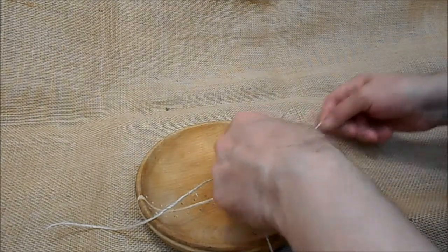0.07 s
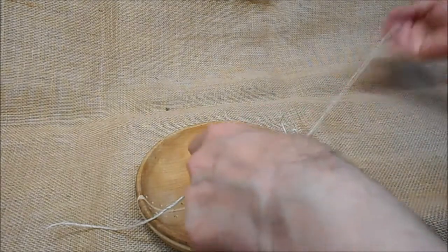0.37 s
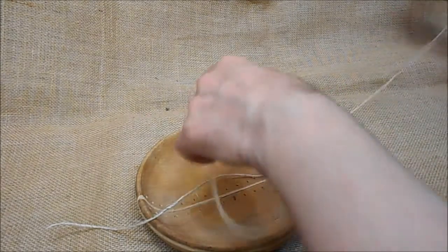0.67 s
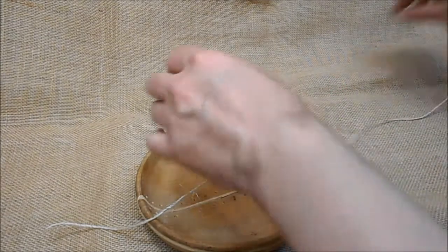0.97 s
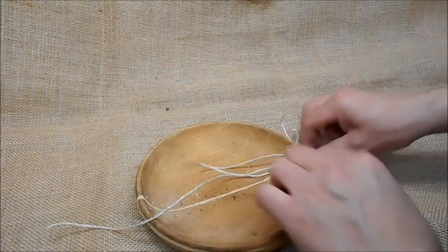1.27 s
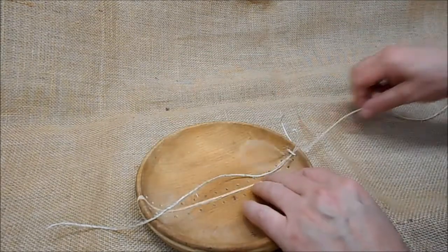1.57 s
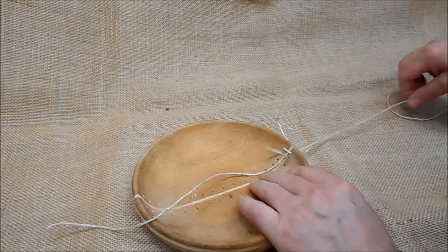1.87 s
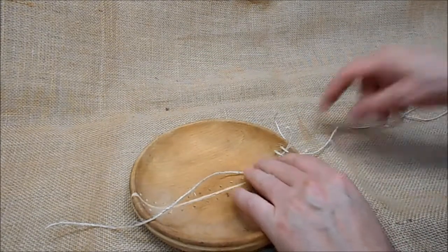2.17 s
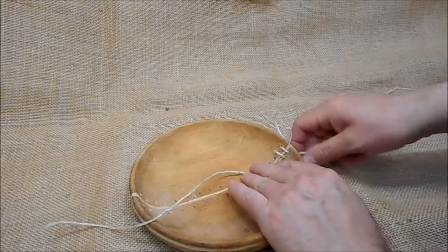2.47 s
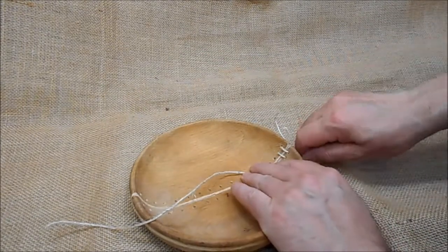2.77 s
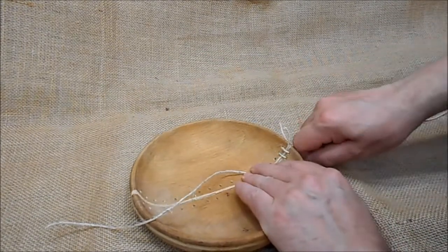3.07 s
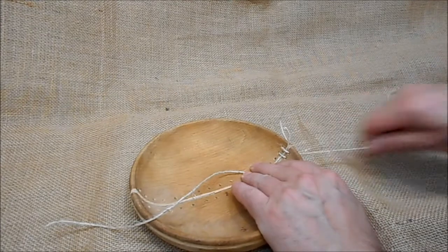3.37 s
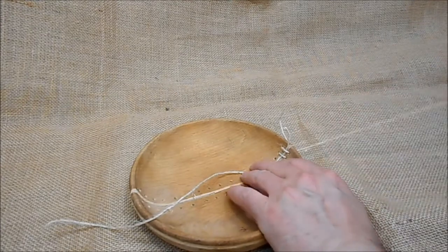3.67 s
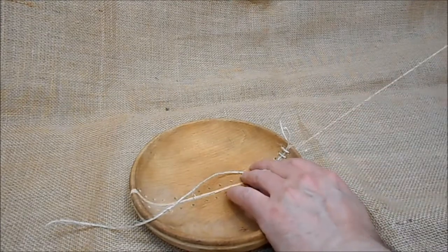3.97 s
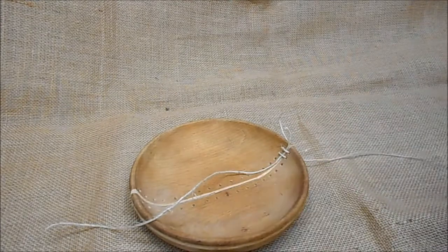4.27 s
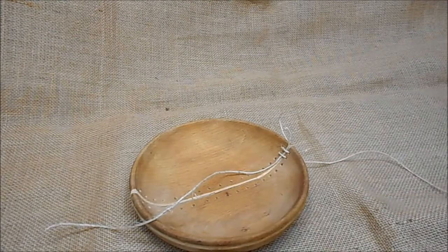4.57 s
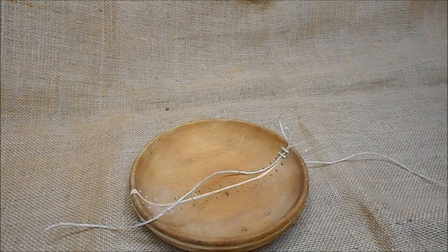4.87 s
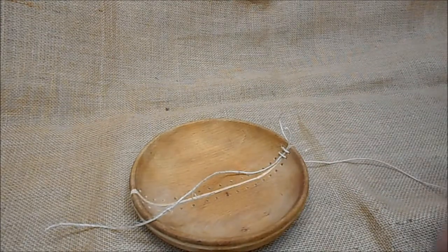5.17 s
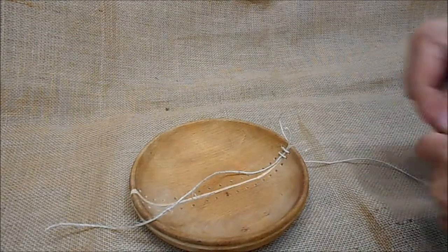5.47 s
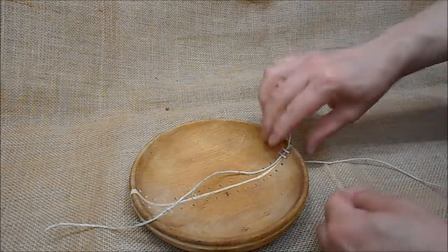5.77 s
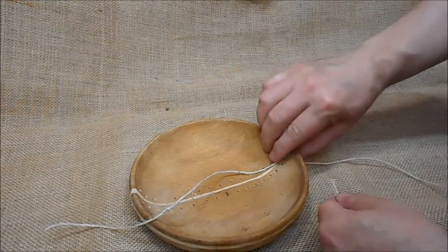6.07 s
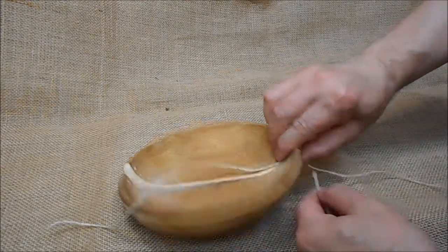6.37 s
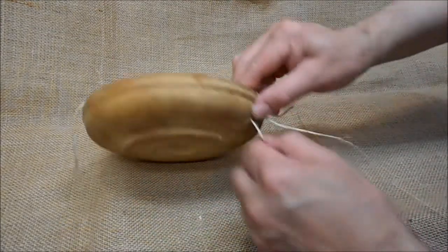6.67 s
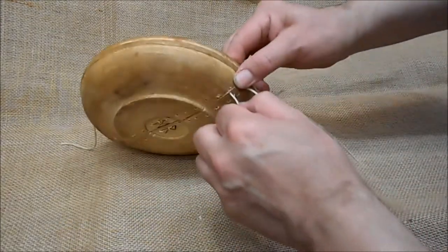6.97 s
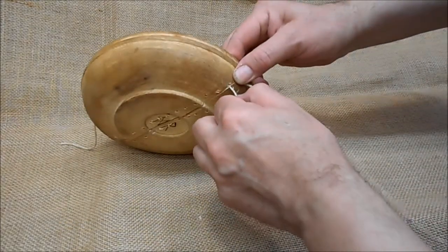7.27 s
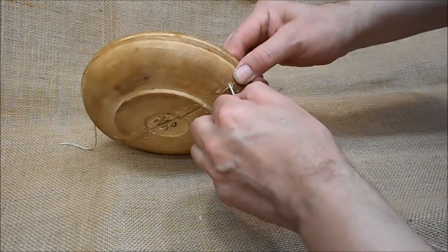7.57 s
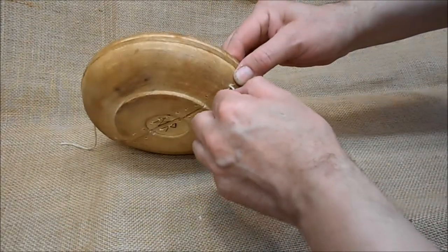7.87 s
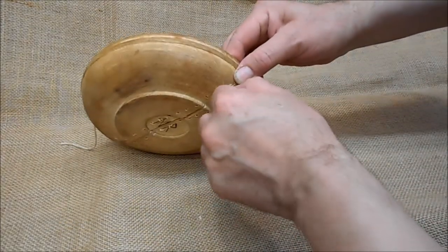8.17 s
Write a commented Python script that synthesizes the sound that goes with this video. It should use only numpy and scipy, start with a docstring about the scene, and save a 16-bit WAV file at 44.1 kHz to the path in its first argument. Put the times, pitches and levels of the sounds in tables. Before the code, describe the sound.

Cord is pulled through a wooden bowl's rim in scratchy, catching strokes, followed by quiet rubbing, fingernail ticks and two wooden thumps.

```python
"""A quiet room, where twine is laced through holes in the rim of a wooden bowl lying on burlap.
The cord rasps through the wood in tiny slips and catches that ring the bowl, hisses through the
fingers and over the cloth, and whistles faintly. Twice it jerks taut and thumps the bowl;
fingernails and cord tick on the rim. Dull table bumps, a faint drone and room tone sit underneath."""
import sys
import numpy as np
from scipy import signal
from scipy.fft import rfft, irfft
from scipy.io import wavfile

SR = 44100
rng = np.random.default_rng(int(sys.argv[2]) if len(sys.argv) > 2 else 0)


def pcm_store(signal):
    """Save signal as 16-bit PCM."""
    levels = np.round(np.clip(np.atleast_2d(signal), -1, 1) * 32767)
    wavfile.write(sys.argv[1], SR, levels.astype(np.int16).T)


N = 366471
TIME = np.arange(N) / SR
CUTOFF_HZ = 10250

# The hand draws cord through a hole: full_speed_s, rise_s, fall_s, level_db
HOLE_PULLS = [(.11, 0.13, 0.14, -34), (.25, 0.1, 0.082, -35), (.38, 0.16, 0.13, -34),
              (.51, 0.11, 0.081, -34.5), (.61, 0.044, 0.062, -39.5), (.72, 0.069, 0.053, -38.5),
              (.8, 0.055, 0.079, -51.5), (1.49, 0.09, .11, -41.5), (1.665, 0.11, 0.13, -44.5),
              (1.86, 0.12, 0.075, -44.5), (1.935, 0.063, 0.062, -44.5), (2.495, 0.044, 0.078, -45)]
# The twist of the cord catches in the hole and chatters: start_s, level_db, length_s
CORD_CATCHES = [(.001, -32.5, 0.013), (0.041, -30, 0.0061), (0.071, -28.5, 0.0074), (0.088, -31, 0.03),
                (0.14, -35, 0.0073), (0.175, -27.5, 0.0075), (0.195, -26, 0.024), (0.22, -29, 0.045),
                (0.259, -29.5, 0.03), (0.2936, -26, 0.022), (0.322, -28.5, 0.0071), (0.363, -29, 0.033),
                (0.407, -31.5, 0.0087), (0.469, -32.5, 0.0069), (.542, -30, 0.03), (0.693, -42, 0.024),
                (0.73, -35.5, 0.0072), (0.782, -32.5, 0.019), (.910, -47, 0.0056), (1.426, -46, .008),
                (1.482, -40.5, 0.0091), (1.628, -34.5, 0.0092), (1.654, -38.5, 0.016), (1.676, -37, 0.0044),
                (1.717, -37.5, 0.0052), (1.832, -37, 0.0078)]
# Ring of the bowl with the cord in the first hole: pitch_hz, width_hz, gain_db
FIRST_HOLE_MODES = [(534, 99, -26.5), (912, 76, -20), (1272, 37, -8), (1438, 72, -4), (1657, 33, -13),
                    (1770, 97, -15), (2220, 420, -18.5), (2414, 79, -8), (2604, 69, 0), (2750, 54, -5.5),
                    (2910, 70, -14.5), (3150, 72, -21), (3350, 90, -13), (3639, 98, 3), (3930, 71, -10),
                    (4110, 98, -8), (4730, 150, -15.5), (4870, 46, -2.5), (5090, 43, -10), (5560, 150, -17),
                    (6050, 165, -8.5), (7170, 140, -21), (7900, 140, -22.5), (8050, 110, -23),
                    (8880, 130, -19.5), (10070, 200, -39)]
# Its ring with the cord in the second hole: pitch_hz, width_hz, gain_db
SECOND_HOLE_MODES = [(630, 170, -18), (1437, 96, -2.5), (2607, 73, 2), (2955, 270, -7.5), (3620, 130, 1),
                     (4110, 150, -3), (4890, 94, -1.5), (5640, 160, -6.5), (6200, 150, -11),
                     (7050, 140, -17), (8780, 300, -15.5)]
# Direct sound of slipping fibres: frequency_hz, gain_db
FIBRE_EQ = [(100, -30.5), (300, -20.5), (600, -16), (1300, -1), (2800, 4.5), (4000, -1.5), (5400, -5),
            (6800, -6.5), (8500, -12), (10200, -19)]
# Loose cord runs through fingers and over cloth:
# full_speed_s, rise_s, fall_s, body_db, sheen_db, zip_centre_hz
CORD_SLIDES = [(1.34, 0.064, 0.12, -56, -66, 8000), (2.0, .1, 0.32, -62, -73, 8320),
               (2.519, 0.29, 0.44, -56, -55, 7700), (3.02, 0.22, 0.16, -59, -63, 7550),
               (3.32, 0.21, 0.18, -54.5, -54.5, 6300), (3.53, .17, 0.16, -53.5, -50.5, 7370),
               (3.87, 0.51, 0.32, -56, -61.5, 5500), (4.48, .11, .1, -62, -63, 7000),
               (4.6, 0.15, 0.093, -53, -50.5, 6530), (4.72, .2, .15, -57.5, -55, 6900),
               (4.93, 0.073, .1, -59, -57, 7000), (5.04, .2, .2, -66.5, -68, 7100),
               (5.421, 0.32, 0.35, -59, -60, 7070), (5.491, .08, 0.045, -59, -57.5, 6630),
               (5.9, .055, .035, -64, -65.5, 6320), (6.2, .2, 0.18, -58, -66, 6500),
               (6.415, 0.032, 0.05, -58.5, -65, 6470), (6.56, .13, 0.38, -64, -74, 6430)]
# Midrange body of the slide: frequency_hz, gain_db
SLIDE_BODY_EQ = [(80, -35), (300, -14), (900, -11), (1600, -8.5), (2600, -1.5), (3300, -4), (4200, 0),
                 (5300, -7), (6500, -13.5), (9000, -26)]
# Airy top of the slide: frequency_hz, gain_db
SLIDE_SHEEN_EQ = [(3500, -24), (5500, -2), (7000, -2.5), (8000, -3), (8700, -5.5), (9500, -5.5),
                  (10300, -19.5)]
# Strokes of the long fast pull of taut cord: full_speed_s, rise_s, fall_s, level_db
TAUT_PULLS = [(3.29, 0.047, .1, -50), (3.39, 0.047, 0.062, -48), (3.55, 0.24, 0.28, -56.5),
              (3.86, 0.18, 0.32, -58.5)]
# Broad resonances of that pull: pitch_hz, width_hz, gain_db
TAUT_CORD_MODES = [(1070, 54, 5), (1433, 120, 4.5), (1920, 470, -5.5), (2853, 230, -5.5), (3800, 110, -8)]
# The cord jerks taut and thumps the bowl: start_s, level_db, lowpass_hz
CORD_JERKS = [(3.598, -23, 1050), (3.8953, -32, 373)]
# At each jerk the bowl rocks on the cloth in the same quick run of blows: delay_s, level_db
ROCKING_BLOWS = [(0, -14), (.0033, -2), (.0099, -1.5), (0.0189, -9.5), (.0255, -12)]
# Low body of the bowl: pitch_hz, width_hz, gain_db
LOW_BOWL_MODES = [(166, 47, -22.5), (307, 65, -9.5), (455, 98, -1.5), (588, 74, 4.5), (760, 86, -1),
                  (890, 69, -3.5), (1150, 130, -5.5), (1460, 184, -4)]
# Nails and cord tick on the rim: start_s, level_db, snap_db
RIM_TICKS = [(1.8, -33, -9), (1.8371, -25, -21), (1.842, -26, -22), (1.943, -32, -12),
             (2.2691, -35.5, -15.5), (2.347, -32, -33), (2.8571, -33.5, -15), (2.984, -46, -17),
             (3.008, -42, -22), (3.038, -35.5, -24), (3.061, -35, -28), (3.083, -31, -20),
             (3.2154, -39.5, -21), (4.078, -35.5, -13), (6.178, -26.5, -24), (6.314, -27.5, -6),
             (6.3294, -31, -31), (6.336, -41, -28), (6.9596, -48, -10), (7.8665, -43, -13),
             (8.239, -38, -16)]
# Damped ring of the rim: pitch_hz, width_hz, gain_db
RIM_MODES = [(1610, 1100, -7.5), (2690, 430, 1), (3520, 570, 0.5), (4230, 420, 3), (5810, 720, -5)]
# Fingers pinch the cord against the rim: start_s, length_s, level_db
CORD_PINCHES = [(1.79, .19, -47.5), (2.971, 0.043, -54.5), (3.036, 0.061, -50.5), (3.80, 0.023, -59),
                (3.99, 0.017, -51), (4.04, 0.063, -49.5), (4.585, .045, -52.5), (5.899, 0.021, -55.5),
                (5.958, 0.063, -54), (6.111, 0.068, -47), (6.316, 0.035, -61)]
# Path of the running cord's one thin whistle: time_s, pitch_hz, level_db
WHISTLE_PATH = [(1.66, 8400, -70), (1.73, 8260, -68), (1.809, 9100, -68), (1.87, 8300, -63),
                (1.97, 9100, -77), (2.02, 9200, -70), (2.09, 8700, -70), (2.135, 7400, -73)]
# Rougher squeaks of the cord: start_s, length_s, start_hz, end_hz, width_hz, level_db
CORD_SQUEAKS = [(2.109, 0.18, 4750, 4600, 200, -61), (2.118, .18, 3550, 3340, 140, -64.5),
                (2.121, 0.18, 2520, 2430, 100, -64.5), (2.242, 0.083, 4300, 4400, 220, -58),
                (3.073, 0.19, 4000, 4400, 280, -61.5), (3.253, 0.24, 5740, 6270, 400, -56),
                (3.299, 0.43, 3680, 3830, 200, -57.5), (3.69, .16, 5200, 5170, 140, -62),
                (4.466, .22, 2445, 2530, 120, -60.5), (4.481, 0.17, 4030, 4120, 200, -59),
                (4.75, .65, 4460, 4800, 250, -68), (5.423, 0.11, 4070, 4180, 450, -53.5),
                (5.968, .04, 3780, 3760, 130, -56.5), (6.693, .11, 4500, 4430, 70, -68),
                (6.77, 0.16, 4980, 5550, 90, -71), (6.948, 0.065, 4400, 4520, 80, -66),
                (7.06, .1, 5250, 5000, 90, -71), (7.272, 0.068, 3000, 2980, 70, -64),
                (7.405, 0.1, 3980, 3950, 40, -62), (7.437, 0.11, 4200, 4200, 350, -64),
                (7.76, 0.099, 3870, 3700, 45, -63.5), (8.175, .11, 3600, 4320, 300, -62.5)]
# Dull bumps pass through the cloth into the table: start_s, level_db
TABLE_BUMPS = [(2.271, -72), (3.605, -61), (3.90, -59.5), (4.078, -69), (5.351, -70), (6.41, -72)]
# Swells of the low drone: peak_s, rise_s, fall_s, level_db
DRONE_SWELLS = [(.12, .4, .25, -74), (.87, 0.23, 0.17, -81), (2.35, 1, .8, -87), (3.8, .22, 0.3, -85)]
# Hush of the room: frequency_hz, gain_db
ROOM_TONE_EQ = [(15, -43), (25, -10), (123, -10.5), (158, -8.5), (231, -9), (276, -7.5), (364, -5.5),
                (424, -6.5), (519, -3.5), (1030, -1.5), (3120, -2), (4020, -4.5), (4340, -5), (8580, -17.5),
                (10500, -29.5), (13600, -61), (22000, -120)]


def rasp(second_hole_s=1.2):
    """Slips of the cord in the hole ring the bowl; a catch lets go with a jab and a burst of slips."""
    drag = strokes(HOLE_PULLS) * from_db(-0.5 + 0.54 * drift(130))
    chatter, jabs = np.zeros(N), np.zeros(N)
    for start_s, db, length_s in CORD_CATCHES:
        age = TIME[:4096] / length_s
        add(chatter, start_s, from_db(db) * np.exp(-age ** 4))
        add(jabs, start_s, from_db([db + 18.5]))
        drag *= stall(start_s)
    slips = grains(per_s=2600, spread_db=4.5)
    bursts = from_db(-2) * chatter * grains(per_s=9000, spread_db=2.5)
    force = slips * drag + bursts + jabs
    in_second_hole = TIME > second_hole_s   # the bowl rings differently at each hole
    wood = 0
    for modes, when in ((FIRST_HOLE_MODES, ~in_second_hole), (SECOND_HOLE_MODES, in_second_hole)):
        ring = cut(resonate(force * when, modes), 450, "high")
        wood += ring / np.std(resonate(slips, modes))
    fibres = colour(grains(per_s=1800, spread_db=3.5), FIBRE_EQ) * np.hypot(drag, 0.5 * chatter)
    return from_db(-1.5) * wood + from_db(-6.5) * fibres


def stall(release_s, stall_s=0.012, dip_db=-4.5):
    """Gain that ducks the rasp as the cord slows just before a catch lets go."""
    gain = np.ones(N)
    before = (TIME < release_s) & (TIME > release_s - 10 * stall_s)
    gain[before] = from_db(dip_db * np.exp((TIME[before] - release_s) / stall_s))
    return gain


def slide():
    """Loose cord brushes in dense fine grains; a high zip glides in pitch from stroke to stroke."""
    full_speed_s, *_, centre_hz = np.transpose(CORD_SLIDES)
    body = strokes(CORD_SLIDES) * colour(grains(per_s=12000, spread_db=3), SLIDE_BODY_EQ)
    zip_band = cut(noise_band(np.interp(TIME, full_speed_s, centre_hz), width_hz=710), 3000, "high")
    air = colour(grains(per_s=15000, spread_db=4), SLIDE_SHEEN_EQ)
    sheen = strokes(CORD_SLIDES, level_column=4) * (from_db(-3.5) * air + from_db(-5) * zip_band)
    flutter = from_db(0.46 * drift(60))
    return (from_db(0.7) * body + sheen) * flutter


def taut_rub():
    """Stretched cord running fast drones in a few broad resonances."""
    rub = cut(resonate(grains(per_s=6000, spread_db=-0.5), TAUT_CORD_MODES), 600, "high")
    return strokes(TAUT_PULLS) * rms_one(rub)


def thumps():
    """Each jerk rocks the bowl; the soft blows reach only its low modes."""
    out = np.zeros(N)
    for start_s, db, lowpass_hz in CORD_JERKS:
        for delay_s, blow_db in ROCKING_BLOWS:
            blow = cut(contact(scatter=0.07, decay_s=0.0076), lowpass_hz, "low")
            thump = resonate(blow, LOW_BOWL_MODES)
            add(out, start_s + delay_s, from_db(db + blow_db) * thump / np.abs(thump).max())
    return out


def ticks():
    """Hard little touches of nail and cord: a damped knock of the rim with a bright snap on top."""
    out = np.zeros(N)
    for start_s, db, snap_db in RIM_TICKS:
        push = contact(scatter=0.1, decay_s=0.0035)
        knock = cut(resonate(push, RIM_MODES), 670, "high")
        snap = cut(cut(push, 8200, "high"), CUTOFF_HZ, "low", order=8)
        tick = rms_one(knock) + from_db(snap_db + 4) * rms_one(snap)
        add(out, start_s, from_db(db + 1.5) * tick / np.abs(tick).max())
    return out


def pinches():
    """Fibres crackle against the rim, swelling with the pressure of the fingers."""
    pressure = np.zeros(N)
    for start_s, length_s, db in CORD_PINCHES:
        add(pressure, start_s, from_db(db) * np.sin(np.linspace(0, np.pi, int(length_s * SR))))
    snaps = grains(per_s=2200, spread_db=3.5)
    rim = rms_one(resonate(snaps, RIM_MODES))
    crackle = cut(colour(snaps, FIBRE_EQ), 1700, "high")
    return pressure * (from_db(-11) * rim + from_db(-0.5) * crackle)


def whistles(waver_hz=75):
    """Evenly spaced fibres sing as they pass an edge: one thin whistle and many rougher squeaks."""
    time_s, pitch_hz, level_db = np.transpose(WHISTLE_PATH)
    pitch = np.interp(TIME, time_s, pitch_hz) + waver_hz * drift(900)
    gain = from_db(np.interp(TIME, time_s, level_db, left=-np.inf, right=-np.inf))
    out = np.sqrt(2) * gain * np.sin(2 * np.pi * np.cumsum(pitch) / SR)
    for start_s, length_s, start_hz, end_hz, width_hz, db in CORD_SQUEAKS:
        along = np.linspace(0, 1, int(length_s * SR))
        squeak = noise_band(start_hz + (end_hz - start_hz) * along, width_hz)
        add(out, start_s, from_db(db) * np.sin(np.pi * along) * squeak)
    return out


def bumps(decay_s=0.068, dull_hz=220, size=12000):
    """Knocks muffled by the cloth reach the table as a low rumble that dies quickly."""
    out = np.zeros(N)
    fade = np.exp(-TIME[:size] / decay_s)
    for start_s, db in TABLE_BUMPS:
        rumble = cut(cut(rng.standard_normal(size), dull_hz, "low"), 35, "high")
        add(out, start_s, from_db(db) * rms_one(rumble) * fade)
    return out


def drone(pitch_hz=57.7):
    """A faint low hum swells and fades."""
    return strokes(DRONE_SWELLS) * noise_band(np.full(N, pitch_hz), width_hz=2.4)


def reflections(send, t60_s=0.16, predelay_s=0.003, size=12000):
    """The table and walls return a short diffuse tail."""
    age = TIME[:size]
    tail = rng.standard_normal(size) * from_db(-60 * age / t60_s) * (age > predelay_s)
    return signal.fftconvolve(send, tail / np.linalg.norm(tail))[:N]


def room_tone():
    """An even bed of soft noise."""
    return from_db(-60) * cut(colour(rng.standard_normal(N), ROOM_TONE_EQ), 45, "high", order=1)


def strokes(rows, level_column=3):
    """Envelope of swells that rise and fall in quarter sines; overlaps add in power."""
    power = np.zeros(N)
    for row in rows:
        peak_s, rise_s, fall_s = row[:3]
        rise, fall = (np.linspace(0, np.pi / 2, max(int(s * SR), 2)) for s in (rise_s, fall_s))
        swell = from_db(row[level_column]) * np.sin(np.concatenate([rise, fall[::-1]]))
        power += np.interp(TIME, peak_s - rise_s + TIME[:len(swell)], swell, left=0, right=0) ** 2
    return np.sqrt(power)


def grains(per_s, spread_db):
    """Fibres let go at random moments, with uneven strength."""
    sizes = from_db(spread_db * np.minimum(rng.exponential(1, N), 4))
    signs = rng.choice([-1, 1], N)
    return rms_one(sizes * signs * (rng.random(N) < per_s / SR))


def contact(scatter, decay_s, size=4096):
    """A sharp touch followed by a short scatter of smaller ones."""
    push = scatter * rng.standard_normal(size) * np.exp(-TIME[:size] / decay_s)
    push[0] += 1
    return push


def noise_band(centre_hz, width_hz):
    """Noise of rms 1 around a centre that can glide; the wider, the less tone."""
    wobble = cut(rng.standard_normal((2, len(centre_hz) + 2000)), width_hz, "low")[:, 2000:]
    phase = 2 * np.pi * np.cumsum(centre_hz) / SR
    return rms_one(wobble[0] * np.cos(phase) + wobble[1] * np.sin(phase))


def resonate(x, modes):
    """Parallel resonators with alternating polarity."""
    out = 0
    for k, (hz, width_hz, db) in enumerate(modes):
        radius = np.exp(-np.pi * width_hz / SR)
        feedback = [1, -2 * radius * np.cos(2 * np.pi * hz / SR), radius ** 2]
        gain = (-1) ** k * from_db(db) * (1 - radius ** 2) / 2
        out += gain * signal.lfilter([1, 0, -1], feedback, x)
    return out


def colour(x, eq, size=2 ** 19):
    """Shape a steady sound with an EQ curve; rms 1."""
    hz, db = np.transpose(eq)
    bins_hz = np.maximum(np.fft.rfftfreq(size, 1 / SR), 1)
    gain = from_db(np.interp(np.log(bins_hz), np.log(hz), db))
    return rms_one(irfft(rfft(x, size) * gain)[:N])


def drift(rate_hz):
    """Smooth random modulation of rms 1."""
    knots = rng.standard_normal(int(N / SR * rate_hz) + 2)
    return rms_one(np.interp(TIME * rate_hz, np.arange(len(knots)), knots))


def cut(x, hz, kind, order=2):
    """Butterworth low- or high-pass."""
    return signal.sosfilt(signal.butter(order, min(hz, .45 * SR), kind, fs=SR, output="sos"), x)


def add(out, start_s, sound):
    """Drop a short sound onto a track."""
    start = max(round(start_s * SR), 0)
    out[start:start + len(sound)] += sound[:max(N - start, 0)]


def from_db(db):
    """Decibels to gain."""
    return 10 ** (np.asarray(db) / 20)


def rms_one(x):
    """Scale to rms 1."""
    return x / np.sqrt(np.mean(x ** 2) + 1e-20)


def scene():
    """Cord and bowl over the even hush of the room, in mono."""
    rasping, taps, thumping = rasp(), ticks() + pinches(), thumps()
    send = from_db(-9) * rasping + from_db(-10) * taps + from_db(-16) * thumping
    background = reflections(send) + room_tone() + drone()
    cord = rasping + slide() + taut_rub() + from_db(1) * whistles()
    return (cord + taps + thumping + bumps() + background)[None]


def record(dry):
    """A steep low-pass takes the top off the mix."""
    return signal.sosfilt(signal.ellip(10, .2, 70, CUTOFF_HZ, fs=SR, output="sos"), dry)


dry = scene()
out = record(dry)
pcm_store(out)
```